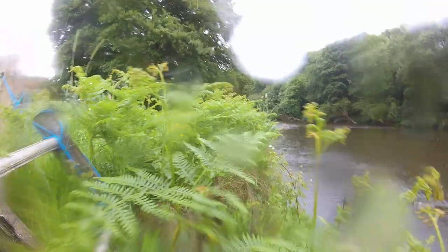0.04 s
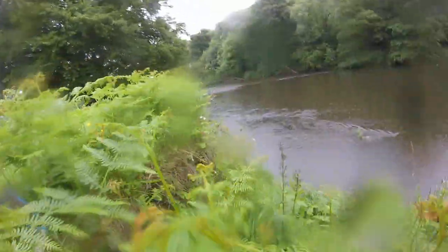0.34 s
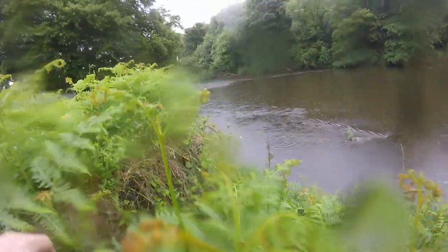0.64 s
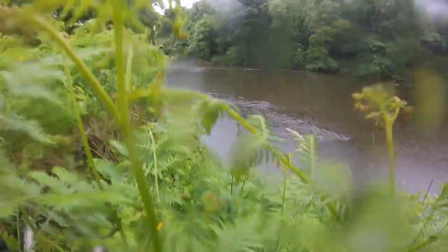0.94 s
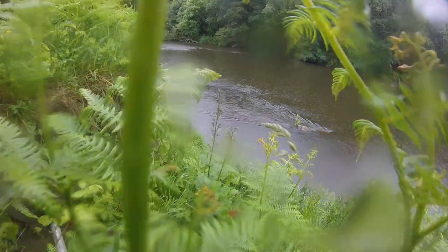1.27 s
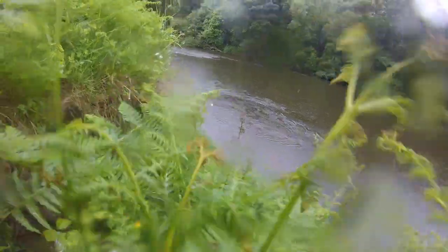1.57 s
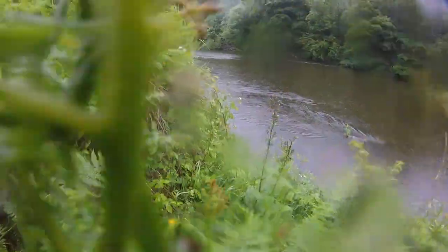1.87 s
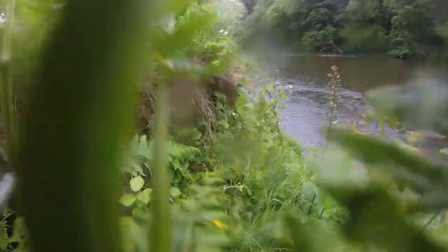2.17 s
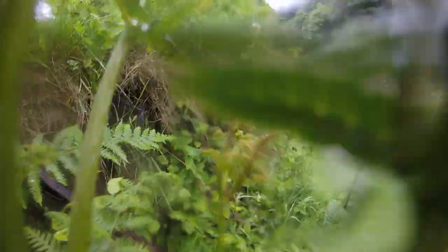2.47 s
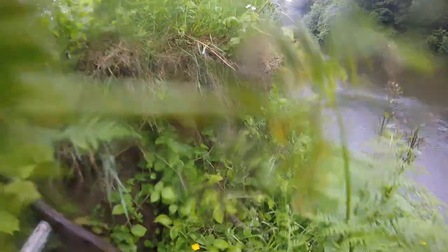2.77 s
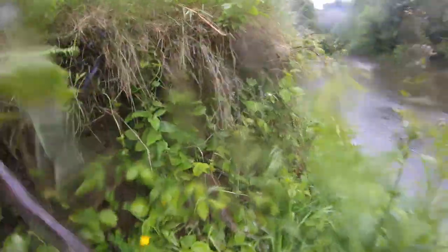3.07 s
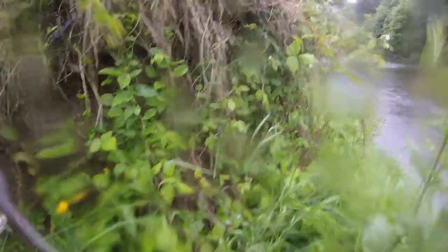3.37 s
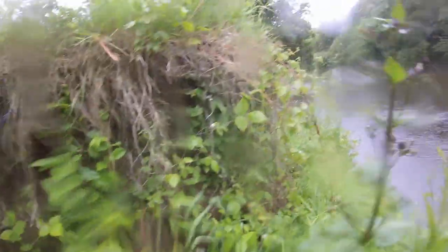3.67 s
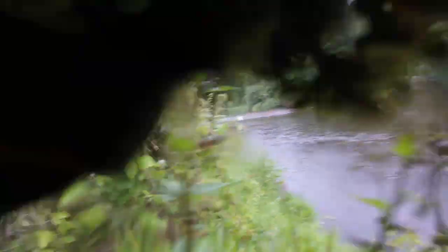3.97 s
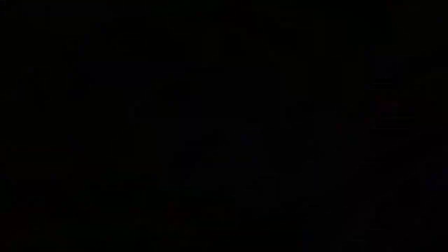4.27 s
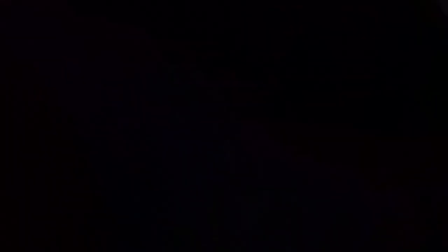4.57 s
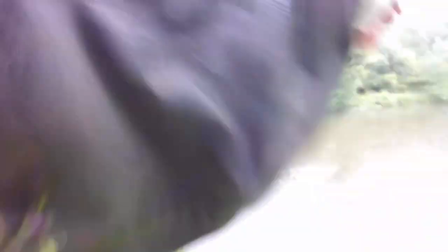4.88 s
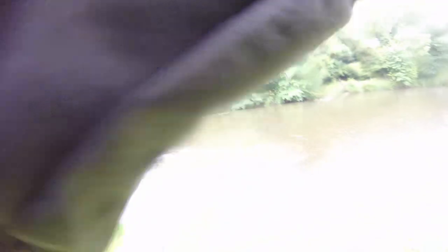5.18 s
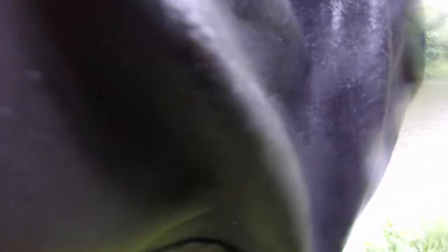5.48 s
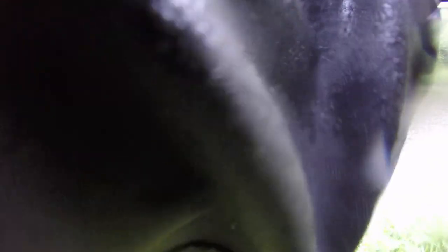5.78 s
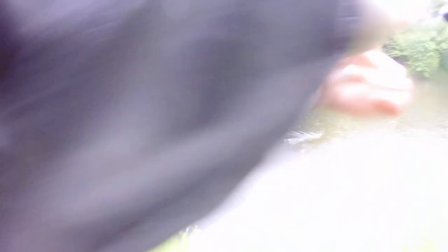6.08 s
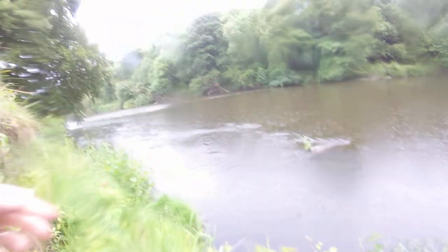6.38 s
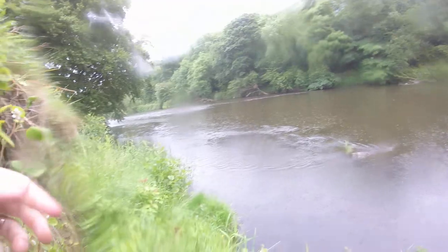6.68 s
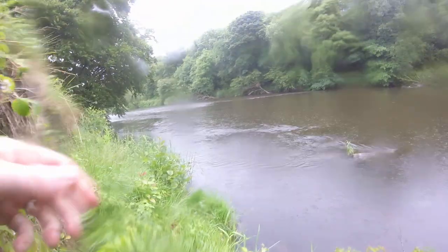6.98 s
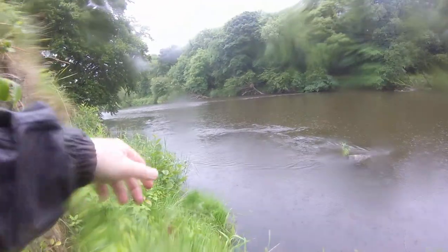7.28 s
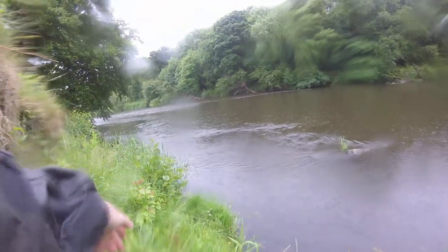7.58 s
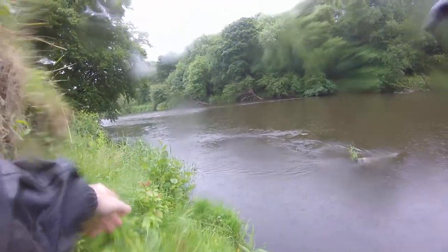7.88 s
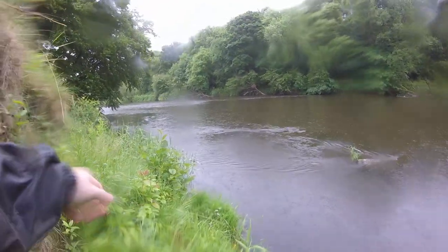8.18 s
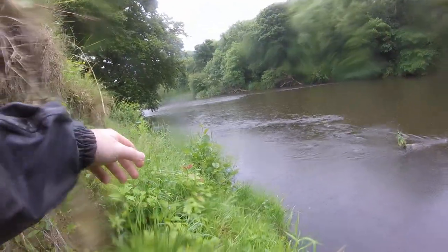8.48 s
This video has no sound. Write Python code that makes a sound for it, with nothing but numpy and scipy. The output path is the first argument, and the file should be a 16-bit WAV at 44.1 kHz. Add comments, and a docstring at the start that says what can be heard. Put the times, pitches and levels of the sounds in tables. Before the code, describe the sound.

A fishing reel and tackle click and knock right against the plastic case of a body-worn microphone, sounding hard and slightly hollow. A quick, uneven burst fills the first 0.7 seconds, with low footstep bumps, rumbling straps and rustling bracken. After a quieter stretch, loud clicks return at 1.8 seconds. From 2 to 3 seconds a waterproof sleeve scrapes over the case while stems snap and give tiny creaks. More bumps and leafy brushing lead to the loudest clatter around 3.8 seconds, and a stem cracks sharply just before 4. The sleeve swishes again from 4 to about 5.3 seconds, among scattered knocks. After a brief lull, lighter, softer ticks and gentle rustles continue from 6 seconds, thinning out toward the end at nearly 9 seconds. Behind everything lies the faint, steady rush of a river.

```python
"""Reel and tackle click in irregular bursts, right on the plastic case of a body-worn camera.
An angler is pushing through bracken on a river bank: steps jolt the mount, straps rumble, fronds
brush past, stems snap and creak, and a waterproof sleeve rubs over the case.
The microphone sits inside, so the knocks reach it through the ringing shell.
Farther off lies the faint rush of the river."""
import sys
import numpy as np
from scipy.fft import rfft, irfft, next_fast_len
from scipy.io import wavfile
from scipy.ndimage import map_coordinates

SR = 44100
rng = np.random.default_rng(int(sys.argv[2]) if len(sys.argv) > 2 else 0)


def inscribe(sig):
    """Save sig as 16-bit PCM at rate SR to the path in sys.argv[1].

    A 1-D sig is mono; a 2-D sig holds one channel per row.
    Samples are clipped to [-1, 1] before scaling.
    """
    pcm = np.round(np.clip(np.atleast_2d(sig).T, -1, 1) * 32767)
    wavfile.write(sys.argv[1], SR, pcm.astype(np.int16))


N = 385417

# resonances of the case, from its shell to its thin edges: pitch_hz, width_hz, level_db
SHELL_MODES = [(1435, 136, 2.3), (1532, 490, 7), (1849, 243, 7.7)]
RIM_MODES = [(2422, 210, 1), (2798, 360, 4.5), (3630, 150, -7.5)]
CRACK_MODES = [(4030, 560, -5.5), (4780, 280, -3), (6107, 600, -9), (6450, 760, -10), (7560, 970, -9),
               (9450, 610, -15), (12100, 1900, -40)]
# spectrum of shifting straps and mount: frequency_hz, level_db
RUMBLE_SPECTRUM = [(12, -8), (25, 5), (50, -5.5), (100, -0.5), (160, -6), (250, -8.5), (330, -17),
                   (700, -27.5), (1300, -61.5)]


def amp(db):
    return 10 ** (np.asarray(db) / 20)


def unit(x):
    return x / np.sqrt(np.mean(x ** 2) + 1e-20)


def wobble(rate):
    """A smooth random curve, rate knots a second."""
    knots = rng.standard_normal(int(N * rate / SR) + 4)
    return map_coordinates(knots, [np.arange(N) * rate / SR])


def filtered(x, response):
    """x times a complex response of frequency."""
    size = next_fast_len(len(x) + 2048)
    return irfft(rfft(x, size) * response(np.fft.rfftfreq(size, 1 / SR)), size)[:len(x)]


def below(x, edge_hz, steepness=8):
    """The part of x under an edge frequency."""
    return filtered(x, lambda hz: 1 / (1 + (hz / edge_hz) ** steepness))


def coloured(x, spectrum):
    """x shaped by (frequency_hz, level_db) points, at rms 1."""
    points_hz, db = np.transpose(spectrum)
    return unit(filtered(x, lambda hz: amp(np.interp(np.log(hz + 1), np.log(points_hz), db))))


def ringing(x, modes):
    """x through steep-sided resonances."""
    return filtered(x, lambda f: sum(
        amp(db) * (1j * f * width / (hz * hz - f * f + 1j * f * width)) ** 2 for hz, width, db in modes))


def grains(rate, spread_db):
    """Random tiny impacts of very unequal size, at rms 1."""
    size = amp(spread_db * np.minimum(rng.standard_exponential(N), 4)) * rng.choice([-1, 1], N)
    return unit(size * (rng.random(N) < rate / SR))


def add(track, start_s, sound):
    """Lay a sound into the track."""
    part = track[max(round(start_s * SR), 0):][:len(sound)]
    part += sound[:len(part)]


def contact(modes, chatter, chatter_t60, tail_db, tail_t60):
    """One blow with a brief chatter and a faint tail, rung through modes; rms 1 over its first 10 ms."""
    t = np.arange(SR // 14) / SR
    decay = amp(-60 * t / chatter_t60) + amp(tail_db - 60 * t / tail_t60)
    force = chatter * rng.standard_normal(len(t)) * decay
    force[0] += 1
    # every spot on the case favours other modes and bends their pitch a little
    struck = [(hz * np.exp(rng.normal(0, .015)), width, db + rng.normal(0, 2)) for hz, width, db in modes]
    ring = ringing(force, struck)
    return ring / np.sqrt(np.mean(ring[:SR // 100] ** 2))


def click(thud_db, rim_db, crack_db):
    """A knock rings the shell, with a low thud from the mount and a bright rim and crack on top."""
    # resonances of the mount: pitch_hz, width_hz, level_db
    thud_modes = [(143.4, 410, -3), (222.2, 196, 10.5), (392, 110, -0.5), (876, 60, -16)]
    thud = contact(thud_modes, chatter=0.058, chatter_t60=0.033, tail_db=-19.5, tail_t60=0.27)
    shell = contact(SHELL_MODES, chatter=0.12, chatter_t60=0.018, tail_db=-19.5, tail_t60=0.072)
    rim = contact(RIM_MODES, chatter=0.25, chatter_t60=0.009, tail_db=-21, tail_t60=0.063)
    crack = contact(CRACK_MODES, chatter=0.057, chatter_t60=0.012, tail_db=-13.5, tail_t60=0.043)
    return (amp(thud_db - 4.5) * thud + amp(-10.5) * shell
            + amp(rim_db - 9.5) * rim + amp(crack_db - 3.2) * crack)


def tackle():
    """Tackle hits the case: hard contacts have more rim and crack, light ones relatively more thud."""
    # strikes of reel and tackle: start_s, level_db, hardness_db
    strikes = [(0.0305, -13.5, -3.5), (0.0691, -5.5, -9), (0.0954, -11.5, -5.5), (0.1492, -17, -8.5),
               (0.185, -4, -6.5), (0.2919, -2.5, -10.5), (0.3215, -30.5, 2), (0.4055, -6.5, -8.5),
               (0.4995, -11, -9), (0.6724, -4, -11), (0.6965, -11, -12), (1.038, -14.5, -5.5),
               (1.0633, -29.5, -7), (1.8234, -2, -11.5), (1.8321, -7, -14), (1.8906, -4.5, -5),
               (1.926, -25.5, -2.5), (2.0255, -15, -9), (2.0491, -18, -3), (2.113, -35, 4),
               (2.1345, -25.5, 1.5), (2.2022, -8.5, -9), (2.262, -3, -21), (2.3248, -22, -1.5),
               (2.435, -6.5, -12.5), (2.6262, -20, 1.5), (2.6901, -18.5, 2), (2.9437, -18, 0),
               (2.9618, -9, -9), (3.1721, -25.5, -17), (3.2202, -26, -6.5), (3.3838, -19, -4.5),
               (3.5112, -11.5, -12), (3.5539, -15, -7), (3.5943, -7.5, -9), (3.6206, -15, -12.5),
               (3.7156, -19, -2), (3.7526, 0, -8.5), (3.7669, -7.5, -33), (3.7732, -11, -31),
               (3.8169, -2.5, -8.5), (3.8405, -18, -10), (3.8708, -12.5, -13), (4.0755, -17, 3.5),
               (4.1059, -24, 5), (4.1147, -25, 1.5), (4.2734, -16.5, -19), (4.3052, -15.5, -3),
               (4.4655, -21, -3), (4.576, -13.5, -8.5), (4.6304, -23.5, -3.5), (4.6541, -11.5, -8.5),
               (5.0615, -26.5, -8), (5.4031, -18, -10.5), (5.683, -22.5, -15.5), (6.0087, -17.5, -9.5),
               (6.0643, -22, -8.5), (6.0963, -11.5, -22), (6.2689, -27.5, -5), (6.5708, -19.5, -14.5),
               (6.8392, -29, -4.5), (6.9034, -28, -11), (7.0654, -22.5, -6.5), (7.16, -33, -1.5),
               (7.2339, -21.5, -3.5), (7.2424, -24, -7), (7.3494, -31.5, -13), (7.4492, -26, -1.5),
               (7.5435, -19, -14), (7.6335, -23, 1.5), (7.686, -23, -5.5), (7.7208, -19.5, -13.5),
               (7.9248, -35, -2.5), (7.9953, -25, -12), (8.0426, -24, -7)]
    out = np.zeros(N)
    for start_s, db, hardness_db in strikes:
        knock = click(thud_db=-15 - 0.063 * db, rim_db=hardness_db, crack_db=-12.5 + 1.48 * hardness_db)
        add(out, start_s, amp(db) * knock)
    return out


def jolts():
    """Each jolt is one low push that sways the mount for a few cycles, the heavier the slower."""
    # steps jolting the mount: start_s, level_db
    steps = [(0.069, -5.5), (0.121, -6), (0.487, -16), (0.971, -20), (2.201, -12), (2.739, -18),
             (2.917, -15), (2.956, -14.5), (3.032, -18), (3.342, -18), (3.451, -6.5), (4.309, -21.5),
             (4.439, -17.5), (4.81, -23), (5.158, -23)]
    full_jolt_hz, db_per_octave = 52.4, 16
    out, t = np.zeros(N), np.arange(SR // 5) / SR
    for start_s, db in steps:
        sway_hz = full_jolt_hz * 2 ** (-db / db_per_octave)
        sway = np.sin(2 * np.pi * sway_hz * t) * amp(-60 * t / 0.049)
        shudder = coloured(rng.standard_normal(len(t)), RUMBLE_SPECTRUM) * amp(-60 * t / 0.078)
        attack = 1 - np.exp(-t / 0.0025)
        push = below((sway + 0.58 * shudder) * attack, edge_hz=790)
        add(out, start_s, amp(db - 1) * push / np.abs(push).max())
    return out


def movement():
    """Strength of leaves and of straps: both follow the walker's effort and swell with every lurch."""
    # how briskly the angler walks: time_s, effort_db
    effort = [(0, 3), (.25, -8.5), (.5, 2), (.78, -6), (1.15, -4.5), (1.45, -1.5), (1.74, -3.5), (2.2, 6),
              (3.15, -2.5), (3.6, 4), (4.0, -0.5), (4.7, 1), (5.3, 0.5), (5.55, -11), (6.2, -2.5),
              (6.7, -10), (7.8, -7), (8.5, -8), (8.74, -4.5)]
    # lurches through the bracken: peak_s, leaves_db, straps_db
    lurches = [(0.092, -21, -15.5), (.45, -33.5, -31.5), (.7, -35.5, -42), (.86, -39, -35),
               (0.989, -33, -29), (1.449, -56, -31.5), (1.848, -30.5, -44), (3.04, -43, -30),
               (3.412, -26.5, -26), (3.48, -29.5, -24.5), (3.65, -35.5, -40), (3.77, -34, -33),
               (4.44, -46, -32.5), (4.83, -42, -26.5), (5.2, -48, -33.5), (6.148, -36.5, -36.5),
               (7.669, -40.5, -37), (8.139, -42, -57)]
    rise_db_per_s, fall_db_per_s = 237.5, 256
    t = np.arange(N) / SR
    effort_db = np.interp(t, *np.transpose(effort))
    leaves, straps = amp(-46.5 + 1.3 * effort_db), amp(-41 + effort_db)
    for peak_s, leaves_db, straps_db in lurches:
        swell = amp(np.minimum(rise_db_per_s * (t - peak_s), fall_db_per_s * (peak_s - t)))
        leaves = np.maximum(leaves, amp(leaves_db) * swell)
        straps = np.maximum(straps, amp(straps_db) * swell)
    return leaves, straps


def through_case(x, rim_db, crack_db):
    """x heard through the whole ringing case, at rms 1."""
    shell, rim, crack = (unit(ringing(x, modes)) for modes in (SHELL_MODES, RIM_MODES, CRACK_MODES))
    return unit(shell + amp(rim_db) * rim + amp(crack_db) * crack)


def taps(level, rate):
    """Stray small contacts, each of its own size and hardness, following a level curve."""
    out = np.zeros(N)
    for when, size, hardness, lightness in rng.random((int(rate * N / SR), 4)):
        strength = level[int(when * N)] * amp(-14 * size)
        if strength > 0:
            tap = click(-16 - 14 * lightness, rim_db=-18 + 21 * hardness, crack_db=-35 + 21 * hardness)
            add(out, when * N / SR, strength * tap)
    return out


def fronds(brushing):
    """Leaves wash along the case in short touches, with the soft taps of stems among them."""
    crackle = grains(rate=400, spread_db=4)
    wash = through_case(crackle + 0.7 * rng.standard_normal(N), rim_db=-8.5, crack_db=-19.5)
    touches = amp(3.6 * wobble(32))
    stems = amp(15) * taps(np.minimum(brushing, amp(-39)), rate=27)
    return amp(-5) * brushing * touches * wash + stems


def harness(shifting):
    """Straps and mount shift in low, lumpy rumbles."""
    lumps = amp(2.3 * wobble(24))
    return amp(1) * shifting * lumps * coloured(rng.standard_normal(N), RUMBLE_SPECTRUM)


def river():
    """The broad, steady rush of the current, faint behind the close sounds."""
    # spectrum of the current: frequency_hz, level_db
    rush = [(150, 6), (500, 1.5), (1050, -1.5), (1400, -9.5), (1950, -0.5), (2800, -8.5), (3800, -10),
            (7800, -17), (11500, -26), (16000, -45.5)]
    return amp(-59 + 1.7 * wobble(1.7)) * coloured(rng.standard_normal(N), rush)


def snaps():
    """A stem snaps on the case: a sharp click with much crack and hardly any thud."""
    # breaking stems: start_s, level_db
    breaks = [(0.3118, -26), (0.448, -30.5), (0.9623, -25.5), (1.009, -34), (2.173, -18.5), (2.6972, -15),
              (3.4895, -16.5), (3.9548, -5), (4.9394, -20.5), (8.026, -36), (8.2727, -37.5)]
    out = np.zeros(N)
    for start_s, db in breaks:
        add(out, start_s, amp(db) * click(thud_db=-30, rim_db=-4, crack_db=-10.5))
    return out


def sleeve():
    """The weave slips on the case and folds snag; a faster stroke hisses more, until the cloth lifts."""
    # strokes of the sleeve: start_s, speed_up_s, slow_down_s, swell_db, rub_db, hiss_db
    strokes = [(1.925, 0.035, 0.092, 28, -41, -54), (2.002, 0.21, 0.073, 10, -33.5, -44.5),
               (2.22, 0.091, 0.2, 11.5, -31, -39.5), (2.51, .12, 0.125, 15.5, -28, -43),
               (2.66, .14, 0.153, 22, -25.5, -38.5), (2.9, .045, 0.035, 17.5, -24.5, -29),
               (4.038, 0.018, 0.098, 11.5, -35, -47.5), (4.151, .15, 0.053, 11, -36, -46),
               (4.349, 0.12, 0.073, 8.5, -37, -46.5), (4.69, 0.15, .04, 19.5, -30.5, -32),
               (5.174, 0.05, 0.081, 12, -32.5, -32), (5.55, 0.078, 0.11, 2, -54, -64.5),
               (5.751, 0.063, 0.053, 9, -54.5, -63.5), (5.88, 0.238, 0.038, 1, -62, -66)]
    # spectrum of the sliding cloth: frequency_hz, level_db
    cloth = [(200, -17), (500, -8.5), (1050, -15), (1500, 1.5), (1950, 6.5), (2800, 4.5), (3900, -8.5),
             (6200, -8.5), (7500, -17.5), (10000, -18), (12000, -30), (15500, -37)]
    hiss_swing, lift_s = 1.27, 0.0031
    friction = coloured(grains(rate=3000, spread_db=6) + 1.47 * rng.standard_normal(N), cloth)
    dull = below(friction, edge_hz=3110)
    rub, hiss = np.zeros(N), np.zeros(N)
    for start_s, rise_s, fall_s, swell_db, rub_db, hiss_db in strokes:
        length_s = rise_s + fall_s
        t = np.arange(int(length_s * SR)) / SR
        speed_db = np.interp(t, [0, rise_s, length_s], [-swell_db, 0, -swell_db])
        touching = np.clip(np.minimum(t, length_s - t) / lift_s, 0, 1)
        add(rub, start_s, touching * amp(rub_db + speed_db - 1))
        add(hiss, start_s, touching * amp(hiss_db + hiss_swing * speed_db + 4))
    # rub and hiss each surge on their own as the folds pass
    rubbing = rub * unit(dull) * amp(4.5 * wobble(35))
    hissing = hiss * unit(friction - dull) * amp(3.5 * wobble(35))
    slipping = (rubbing + hissing) * amp(2.55 * wobble(90))
    snags = amp(17) * taps(np.minimum(rub, amp(-33)), rate=38)
    return slipping + snags


def creaks():
    """A stem sticks and slips in a quick uneven run, singing at one narrow pitch."""
    # wet stems dragging on the case: start_s, length_s, pitch_hz, level_db
    drags = [(1.952, 0.0097, 2580, -25.5), (1.977, 0.015, 1054, -37), (2.317, .014, 810, -35),
             (2.946, 0.029, 1956, -16)]
    slips_per_s, width_hz = 700, 310
    out, t = np.zeros(N), np.arange(SR // 10) / SR
    for start_s, length_s, pitch_hz, db in drags:
        swell = np.sin(np.pi * np.minimum(t / length_s, 1))
        slips = (rng.random(len(t)) < slips_per_s / SR) * swell
        ring = ringing(slips, [(pitch_hz, width_hz, 0)])
        add(out, start_s, amp(db) * unit(ring) * np.sqrt(length_s / t[-1]))
    return out


def scene():
    """The close contacts and the river behind them, at one microphone."""
    leaves, straps = movement()
    mix = tackle() + snaps() + creaks() + jolts() + sleeve() + fronds(leaves) + harness(straps) + river()
    return mix[None]


def record(dry):
    """The loudest clicks flatten at full scale; the camera keeps nothing above its band limit."""
    flattened = dry[0] / (1 + np.abs(dry[0]) ** 6) ** (1 / 6)
    return below(flattened, edge_hz=15400, steepness=80)[None]


dry = scene()
out = record(dry)
inscribe(out)
```